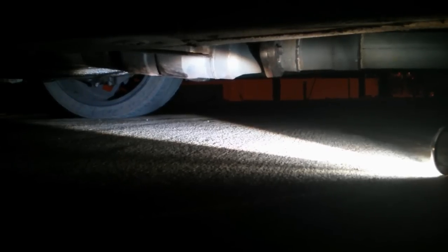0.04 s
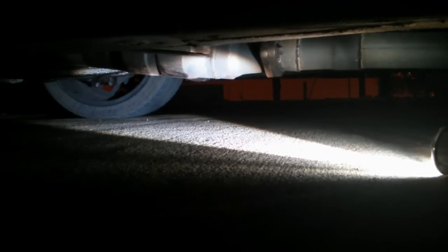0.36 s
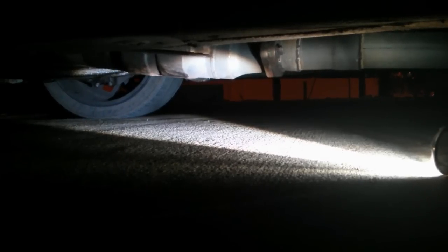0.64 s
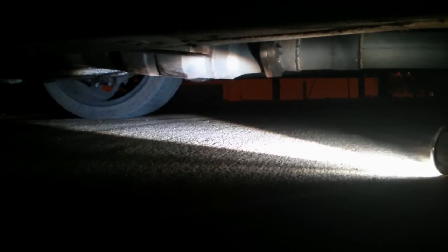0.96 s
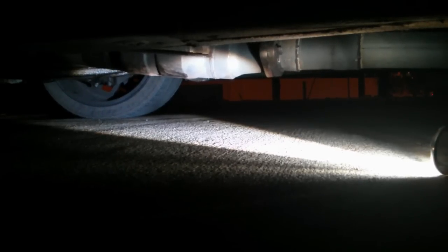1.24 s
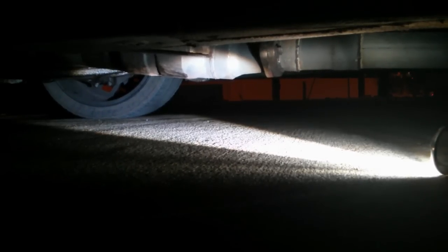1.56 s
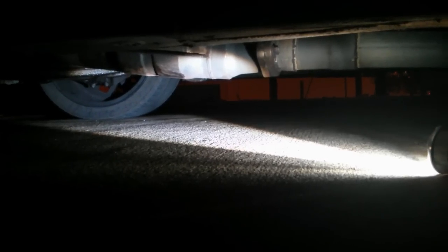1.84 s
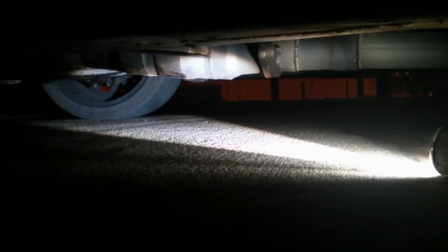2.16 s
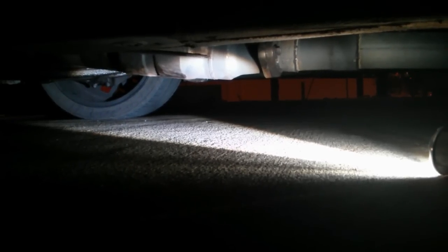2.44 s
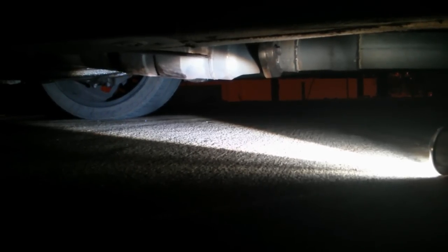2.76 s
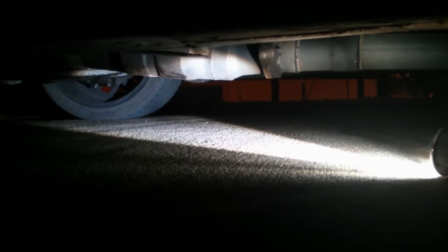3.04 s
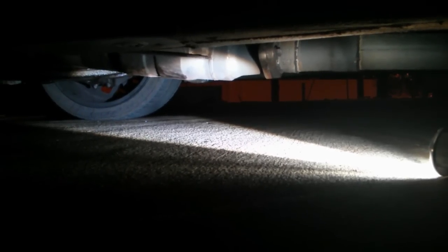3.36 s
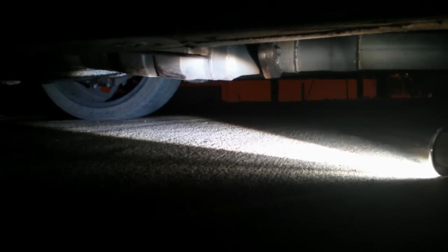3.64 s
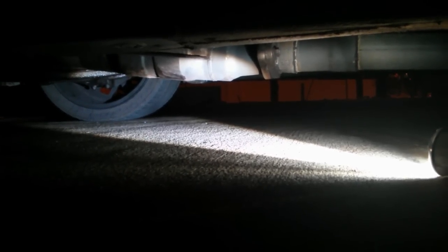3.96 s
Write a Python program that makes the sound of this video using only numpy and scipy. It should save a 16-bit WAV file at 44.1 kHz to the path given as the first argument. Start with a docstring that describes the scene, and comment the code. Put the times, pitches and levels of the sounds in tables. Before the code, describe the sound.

A metallic rattle comes from a car's exhaust, heard close underneath. It clatters and rings in uneven bursts until about 1.2 seconds as the engine revs and falls back to a thumping idle. A second rev from 2 seconds brings sparser rattling, strongest near 2.8. Gas hiss swells with each rev over a mechanical churn. From 3 seconds the engine idles, with dull thumps near the end.

```python
"""Under a car, an engine idles and is revved briefly twice; its exhaust throbs and now and then thumps.
The main sound is a rattle: as the engine speeds up and slows down, loose pieces in the catalytic
converter (a steel can in the exhaust pipe) shake against its shell in uneven bursts and make it ring.
Behind that, gas hisses through the converter, and the engine adds a mechanical churn and faint whines."""
import sys
import numpy as np
from scipy import signal
from scipy.fft import rfft, irfft, next_fast_len
from scipy.io import wavfile
from scipy.ndimage import uniform_filter1d, minimum_filter1d, map_coordinates

SR = 44100
rng = np.random.default_rng(int(sys.argv[2]) if len(sys.argv) > 2 else 0)


def master_out(mix):
    """Clip the mix to full scale and print it as 16-bit PCM to the path in sys.argv[1]."""
    frames = np.transpose(np.atleast_2d(mix))
    ceiling = np.clip(frames, -1, 1)
    pcm = np.round(ceiling * 32767).astype(np.int16)
    wavfile.write(sys.argv[1], SR, pcm)


N = 176400  # 4 seconds
UNEVEN_DB = -22  # unequal cylinders add weak tones halfway between the engine's main ones


def amp(db):
    """Turn decibels into a factor to multiply by."""
    return 10 ** (np.asarray(db) / 20)


def unit(x):
    """Scale a sound to an average strength (rms) of 1."""
    return x / np.sqrt(np.mean(x ** 2) + 1e-20)


def along(points, hz):
    """Read between (frequency, value) points on a logarithmic frequency scale."""
    f, values = np.transpose(points)
    return np.interp(np.log(hz + 1), np.log(f + 1), values)


def curve(rows):
    """Join (time, value) points with straight lines, one value per sample."""
    return np.interp(np.arange(N) / SR, *np.transpose(rows))


def wobble(per_s):
    """A smooth curve through per_s random values a second."""
    knots = rng.standard_normal(int(N * per_s / SR) + 4)
    return map_coordinates(knots, [np.arange(N) * per_s / SR])


def filtered(x, response):
    """Multiply each frequency in x by response(frequency)."""
    size = next_fast_len(N + SR // 2)
    return irfft(rfft(x, size) * response(np.fft.rfftfreq(size, 1 / SR)), size)[:N]


def noise(colour):
    """Noise whose colour table says how strong each frequency is compared with the others."""
    return unit(filtered(rng.standard_normal(N), lambda hz: amp(along(colour, hz))))


def fuzzy_tone(hz, width_hz):
    """A band of noise so narrow that it has a pitch."""
    return unit(filtered(rng.standard_normal(N), lambda f: 1 / (1 + ((f - hz) / width_hz * 2) ** 2)))


def gas_hiss():
    """Gas flowing through the converter makes a fluttering hiss and a faint whistle."""
    # loudness of the hiss and of the whistle: t/s, level/dB
    hiss_levels = [(0, -22), (.3, -22), (.6, -20.5), (.9, -22.5), (1.08, -23), (1.3, -31), (1.68, -31.5),
                   (1.85, -28.5), (2.1, -25.5), (2.25, -22.5), (2.36, -22), (2.8, -20), (3, -23),
                   (3.15, -30.5), (3.68, -33), (3.78, -29.5), (3.87, -30), (4, -27.5)]
    whistle_levels = [(0, -45), (.2, -38), (.3, -49), (.5, -58), (.8, -34), (1, -39), (1.25, -53), (2, -56),
                      (2.2, -43), (2.6, -32.5), (2.8, -38), (3.05, -59), (3.7, -49), (3.87, -41.5),
                      (4, -47)]
    # colour of the hiss: f/Hz, level/dB
    hiss_colour = [(100, -24), (1500, -7.5), (2300, -7.5), (2900, -21), (3600, -22), (4500, -13.5),
                   (5200, -12.5), (6000, -11), (7400, -7), (8300, -1.5), (9300, 1.5), (10500, -3),
                   (12000, -8), (15500, -12.5)]
    flutter_db = 1.15 * wobble(per_s=45)
    hiss = amp(curve(hiss_levels) + flutter_db) * noise(hiss_colour)
    return hiss + amp(curve(whistle_levels)) * fuzzy_tone(hz=4963, width_hz=93)


def engine_churn(firing_hz, phase):
    """The running engine churns with high tones and pulsing noise; faint whines swell along with it."""
    # loudness of the churn: t/s, level/dB
    churn_levels = [(0, -25), (.25, -24.5), (.5, -22), (.85, -26), (1.24, -30), (1.65, -26.5), (1.9, -26.5),
                    (2.05, -25.5), (2.5, -21.5), (2.8, -26), (3.12, -29), (3.4, -26), (3.8, -25),
                    (4, -22.5)]
    # colour of the churn: f/Hz, level/dB
    churn_colour = [(20, -40), (140, 2.5), (220, -4.5), (450, 2), (620, -1), (900, 0.5), (1100, -2),
                    (1500, -10.5), (2100, -22.5), (2500, -48.5), (2900, -53), (3600, -43), (6000, -45),
                    (16000, -70)]
    # whines, compared with the churn at its average level: f/Hz, width/Hz, level/dB
    whine_bands = [(542.8, 5.6, -9.5), (997.8, 16.2, -4.5), (454, 46, -19.5)]
    tones = np.zeros(N)
    for multiple in np.arange(10, 56) / 2:
        tone_db = along(churn_colour, multiple * firing_hz) + 3 * wobble(per_s=5)
        tone_db += UNEVEN_DB / 2 if multiple % 1 else 0
        tones += amp(tone_db) * np.cos(multiple * phase + rng.uniform(0, 2 * np.pi))
    pulsing = noise(churn_colour) * (1 + 0.25 * np.cos(phase))
    churn = unit(pulsing + amp(-6) * unit(tones))
    whines = sum(amp(db) * fuzzy_tone(hz, width) for hz, width, db in whine_bands)
    churn_db = curve(churn_levels)
    whine_db = churn_db.mean() + 0.66 * (churn_db - churn_db.mean())
    return amp(churn_db) * churn + amp(whine_db) * whines


def exhaust_throb(firing_hz, phase):
    """Each firing sends a puff down the pipe: the puffs make a low note and the swirling gas rumbles."""
    # loudness of the note: t/s, level/dB
    note_levels = [(0, -14.5), (.14, -8.5), (.34, -7), (.5, -14.5), (.57, -26), (.66, -13.5), (.75, -14),
                   (.86, -24.5), (.98, -30), (1.4, -32.5), (1.55, -30), (1.88, -22.5), (2, -12.5),
                   (2.2, -9.5), (2.35, -14), (2.55, -19), (2.8, -21.5), (3.17, -36.5), (3.36, -25),
                   (3.65, -22.5), (4, -18.5)]
    # how well the pipe passes each frequency: f/Hz, level/dB
    pipe_colour = [(25, -38), (47, -22), (58, -13), (85, 5), (115, -0.5), (142, -8), (175, -16),
                   (230, -29.5), (290, -20.5), (450, -31)]
    # pipe resonances, which delay and spread each puff: f/Hz, sharpness/Q
    resonances = [(86, 3.8), (128, 6.5)]
    # boom at the firing rate itself, which comes up above idle: f/Hz, level/dB
    boom_levels = [(28, -54), (39, -40), (46, -27), (52, -27), (60, -28)]
    # colour of the rumble: f/Hz, level/dB
    rumble_colour = [(20, -26), (45, -27), (80, -7), (120, -1.5), (160, -11), (220, -13.5), (400, -55.5),
                     (1000, -88)]
    tones, power = np.zeros(N), np.zeros(N)
    for multiple in np.arange(3, 17) / 2:
        hz = multiple * firing_hz
        gain = amp(along(pipe_colour, hz) + (UNEVEN_DB if multiple % 1 else 0))
        lag = sum(np.arctan(q * (hz / centre - centre / hz)) for centre, q in resonances)
        waver_db = 0.7 * wobble(per_s=14)
        tones += gain * amp(waver_db) * np.cos(multiple * phase - lag)
        power += gain ** 2 / 2
    note_db = curve(note_levels)
    note = amp(note_db) * tones / np.sqrt(power)
    boom = np.sqrt(2) * amp(along(boom_levels, firing_hz)) * np.cos(phase)
    rumble_db = -24.5 + 0.49 * (note_db - note_db.mean())  # swells about half as much as the note
    return note + boom + amp(rumble_db) * noise(rumble_colour)


def exhaust_thumps():
    """Each heavy beat swells and dies in the pipe within a few vibrations."""
    # heavy beats: t/s, peak level/dB
    beats = [(1.122, -9.5), (1.254, -18), (1.423, -16), (1.542, -12), (1.696, -8.5), (1.986, -14),
             (2.043, -11), (3.342, -12), (3.697, -8), (3.769, -11), (3.839, -8), (3.913, -10.5),
             (3.978, -7)]
    pitch_hz, rise_s = 118.3, 0.011
    out = np.zeros(N)
    for start_s, db in beats:
        t = np.maximum(np.arange(N) / SR - start_s, 0)
        swell = (t / rise_s * np.exp(1 - t / rise_s)) ** 3
        out += amp(db) * swell * np.sin(2 * np.pi * pitch_hz * t)
    return out


def underbody_echo(x):
    """Add the short echoes that bounce between the car's floor and the ground."""
    fade_s, echo_db = 0.15, -10
    t = np.arange(SR // 3) / SR
    tail = rng.standard_normal(len(t)) * amp(-60 * t / fade_s)
    return x + amp(echo_db) * signal.fftconvolve(x, tail / np.linalg.norm(tail))[:N]


def steel_shell(f):
    """Low, middle and high filters for the ringing shell; each call strikes it at a different spot."""
    # the shell's natural tones: f/Hz, width/Hz, level/dB
    shell_tones = [(668, 37, -3), (727.2, 28.5, -2), (810, 50, -14.5), (906.5, 17, 2.5), (999.6, 32, -10),
                   (1062, 9, -1), (1131, 72, -11.5), (1429, 34, -7.5), (1644, 64, -17), (1819, 46, -8.5),
                   (1888, 18, -10), (2013, 34, -4), (2354, 63, -10), (2689, 38.5, -5), (3044, 31, -17.5),
                   (3340, 45, -13), (3705, 30, -23), (3922, 66, -17.5), (4356, 33, -8), (4460, 34, -9.5),
                   (4635, 63, -9), (4965, 70, -13), (5440, 40, -21.5)]
    splits_hz = (1250, 4100)
    centre, width, db = np.transpose(shell_tones)
    group = np.searchsorted(splits_hz, centre)
    centre = centre * (1 + 0.0033 * rng.standard_normal(len(db)))
    signs = (-1) ** np.arange(len(db))
    gain = signs * amp(db + 3 * rng.standard_normal(len(db)))
    damping = 1j * f * width[:, None]
    responses = gain[:, None] * damping / (centre[:, None] ** 2 - f ** 2 + damping)
    return [responses[group == g].sum(0) for g in range(3)]


def converter_rattle():
    """Loose pieces hit the shell in bursts of tiny taps and scrapes that ring, sizzle and crack."""
    # bursts: t/s, length/s, then level/dB (before trim_db) of low ring, middle clatter, high clink, sizzle
    bursts = [(0, 0.029, -17, -25, -24.5, -37), (0.034, 0.028, -20.5, -24, -26, -27),
              (0.073, 0.045, -19.5, -25.5, -30.5, -31), (0.125, 0.028, -20, -23, -27, -39),
              (0.152, 0.016, -18.5, -19, -27, -33), (0.186, 0.023, -16, -28.5, -37, -36),
              (0.213, 0.033, -19, -24.5, -34, -39), (0.259, 0.03, -20.5, -34, -50, -41),
              (0.382, 0.042, -19, -34.5, -57, -44), (0.511, 0.019, -29, -25, -37, -41),
              (0.539, 0.026, -15, -15, -21.5, -42), (0.565, 0.031, -15.5, -24, -28, -23),
              (0.608, 0.029, -19, -21, -23.5, -18.5), (0.706, 0.042, -16.5, -26, -35, -37),
              (0.784, 0.025, -16, -24.5, -31.5, -34), (0.887, 0.016, -19.5, -22.5, -22, -34),
              (0.903, 0.018, -22, -18, -19, -20), (0.919, 0.017, -18.5, -20.5, -27, -20),
              (0.95, 0.017, -16.5, -21.5, -17.5, -19), (0.988, 0.019, -14.5, -18.5, -17.5, -24),
              (1.012, 0.018, -14, -15, -23, -26), (1.039, 0.024, -20.5, -29.5, -26, -26),
              (1.066, 0.02, -17.5, -21, -34, -27), (1.146, 0.019, -19.5, -27, -44, -48),
              (1.163, 0.024, -20, -25, -33, -41), (1.948, 0.0079, -26, -31.5, -42, -45),
              (2.009, 0.021, -19, -41, -46, -36), (2.083, 0.024, -21.5, -32.5, -29.5, -42),
              (2.122, 0.025, -21, -29.5, -51, -41), (2.155, 0.018, -19.5, -20.5, -25.5, -44),
              (2.2, 0.036, -19.5, -25, -35, -41), (2.591, 0.025, -27, -27, -43, -36),
              (2.714, 0.037, -15, -25.5, -30.5, -37), (2.768, 0.024, -10.5, -19, -22, -17),
              (2.802, 0.019, -9.5, -21.5, -37, -25), (2.83, 0.014, -23, -30, -45, -29),
              (2.873, 0.014, -16, -30, -32, -36), (2.896, 0.02, -15.5, -16, -20.5, -34),
              (2.937, 0.013, -13, -22, -31, -21)]
    # colours of the scraping sizzle and of the taps' bare crack: f/Hz, level/dB
    sizzle_colour = [(500, -40), (3500, -26), (5500, -10), (7600, -8), (8050, 1), (8500, -4), (9250, 2),
                     (10000, -2), (10800, -1.5), (12000, -7), (13300, -9), (14000, -4), (15500, -13)]
    crack_colour = [(300, -30), (700, 1), (2500, 1), (4600, -2), (7000, -4), (15500, -16)]
    trim_db = np.array([-0.5, -0.5, -1.5, 1, -8])  # ring, clatter, clink, sizzle, crack
    taps_per_s, tap_spread_db, scrape_share = 700, 2, 0.47
    early_s, rise_s, fall_s = 0.001, 0.0024, 0.009
    first_blow_db, first_blow_s = 3, 0.005  # a burst starts harder than it goes on
    sizzle_rise_s, sizzle_fall_s = 0.0055, 0.0023  # the sizzle stops with the contact
    size = 8192  # samples set aside for one burst
    t, f = np.arange(size) / SR, np.fft.rfftfreq(size, 1 / SR)
    colours = [amp(along(sizzle_colour, f)), amp(along(crack_colour, f))]
    hardest = np.max(np.array(bursts)[:, 3])
    out = np.zeros(N + 2 * size)
    for start_s, length_s, ring, clatter, clink, sizzle in bursts:
        taps = (rng.random(size) < taps_per_s / SR) * rng.choice([-1, 1], size)
        taps = taps * amp(tap_spread_db * rng.standard_normal(size))
        past_end_s = np.maximum(t - length_s, 0)
        shake = np.minimum(t / rise_s, 1) * np.exp(-past_end_s / fall_s)
        shake *= amp(first_blow_db * np.exp(-t / first_blow_s))
        blows = shake * (unit(taps) + scrape_share * rng.standard_normal(size))
        scrape_shape = np.minimum(t / sizzle_rise_s, 1) * np.exp(-past_end_s / sizzle_fall_s)
        scrape = scrape_shape * rng.standard_normal(size)
        drives = np.array([blows, blows, blows, scrape, blows])  # same order as trim_db
        parts = irfft(rfft(drives) * np.array(steel_shell(f) + colours))
        # give all five parts the same energy before setting their levels
        parts *= np.sqrt(np.sum(shake ** 2) / np.sum(parts ** 2, axis=1, keepdims=True))
        crack = clatter + 0.99 * (clatter - hardest)  # soft bursts crack less
        start = int(np.clip((start_s - early_s) * SR, 0, N))
        out[start:start + size] += amp(trim_db + [ring, clatter, clink, sizzle, crack]) @ parts
    return out[:N]


def scene():
    """Mix all the sounds; one engine speed drives both the exhaust note and the churn."""
    # engine speed as firings per second: t/s, f/Hz
    firing_rates = [(0, 36.5), (.1, 44), (.2, 50), (.32, 56), (.52, 58.5), (.6, 52.5), (.73, 47), (.87, 43),
                    (1.05, 36), (1.3, 28.3), (1.88, 28), (2.03, 37.5), (2.16, 45.5), (2.31, 49.8),
                    (2.48, 51.8), (2.77, 43), (3.25, 28.3), (4, 28.3)]
    firing_hz = curve(firing_rates) * (1 + 0.0036 * wobble(per_s=20))
    phase = 2 * np.pi * np.cumsum(firing_hz) / SR  # one full turn per firing
    engine = exhaust_throb(firing_hz, phase) + exhaust_thumps() + engine_churn(firing_hz, phase)
    return (engine + gas_hiss() + underbody_echo(converter_rattle()))[None]


def record(dry):
    """A fast limiter turns down the loudest peaks, then the very highest treble is cut off."""
    ceiling, limiter_s, top_hz = 0.83, 0.0035, 15730
    x = dry[0]
    span = int(limiter_s * SR)
    needed_gain = np.minimum(1, ceiling / (np.abs(x) + 1e-9))
    held_gain = minimum_filter1d(needed_gain, 2 * span)
    limited = x * uniform_filter1d(held_gain, span)
    return filtered(limited, lambda hz: hz < top_hz)[None]


dry = scene()
out = record(dry)
master_out(out)
```